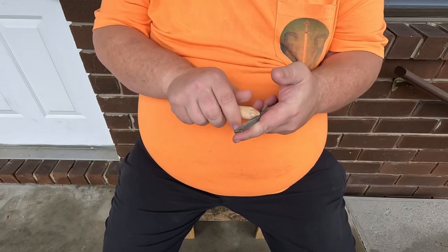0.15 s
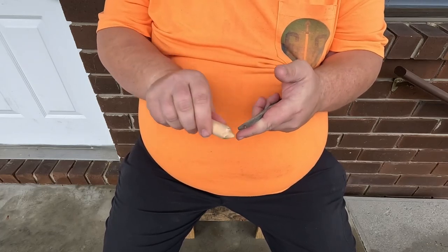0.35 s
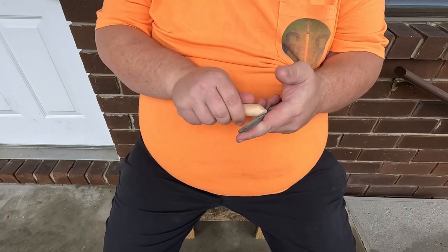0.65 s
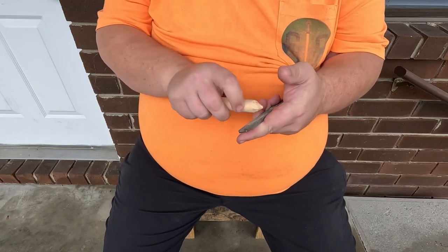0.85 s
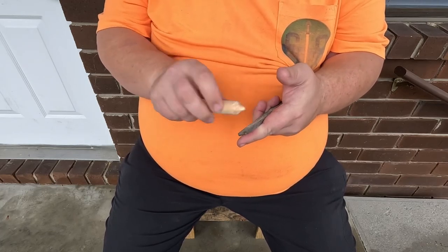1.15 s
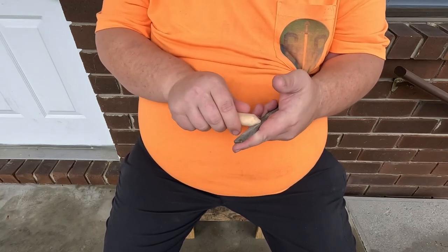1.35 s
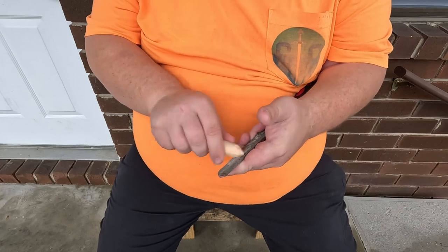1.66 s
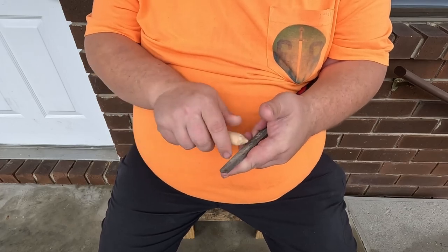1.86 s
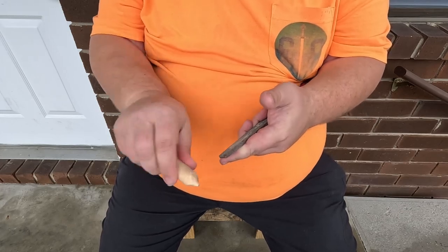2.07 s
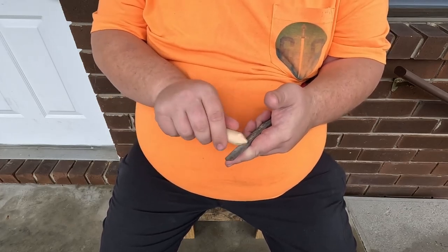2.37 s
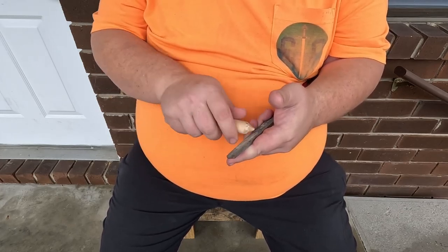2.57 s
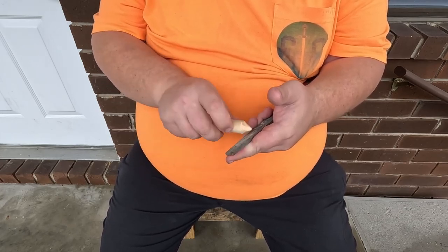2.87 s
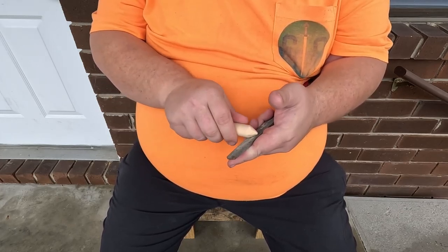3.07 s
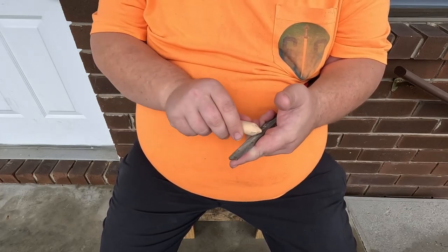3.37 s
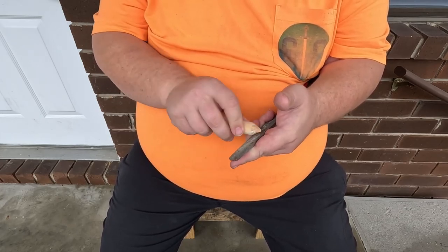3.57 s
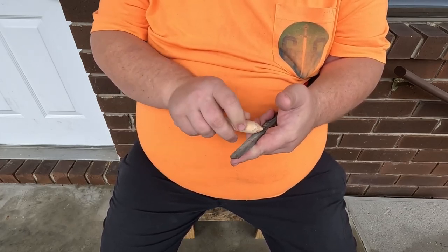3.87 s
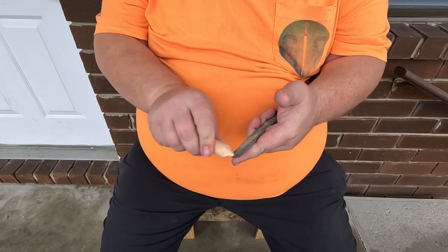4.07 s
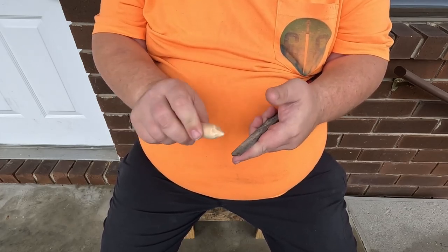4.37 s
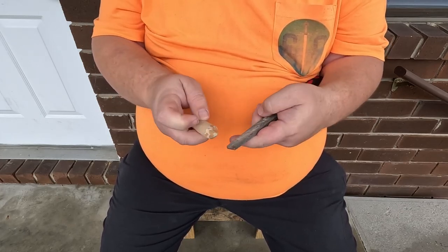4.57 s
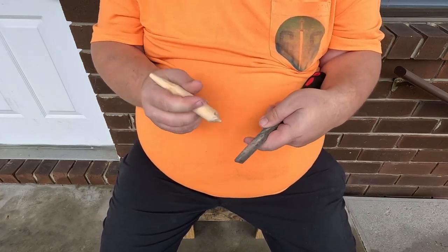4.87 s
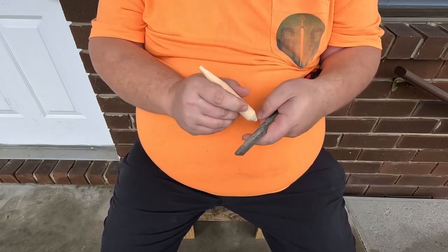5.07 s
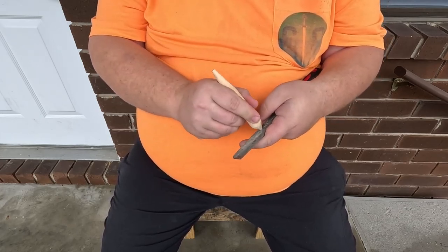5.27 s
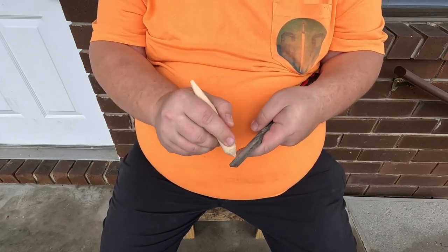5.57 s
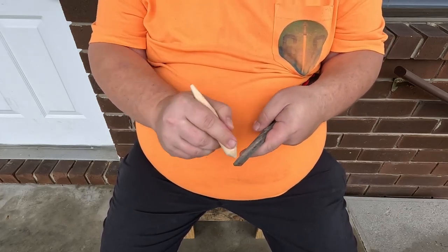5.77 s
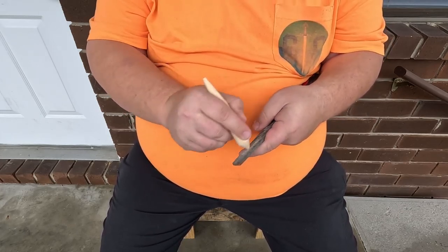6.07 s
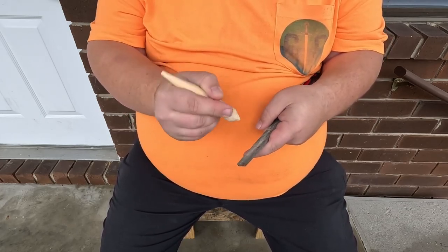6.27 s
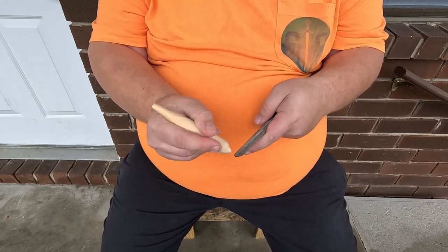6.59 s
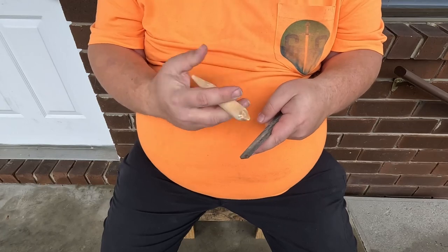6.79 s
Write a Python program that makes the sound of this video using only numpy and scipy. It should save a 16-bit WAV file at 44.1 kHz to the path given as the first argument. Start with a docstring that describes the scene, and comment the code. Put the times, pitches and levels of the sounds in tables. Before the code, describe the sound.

Close, dry rasps of wood on a steel file come at a steady brisk pace, each under a tenth of a second, with faint brushing and small knocks between. After a second-long break of finger rubs and soft clicks, scraping returns less evenly: two coarse strokes, a rapid run of light bright scratches, and one last rasp. Distant traffic and faint engine drones swell softly outdoors; the stereo pickup is near the hands.

```python
"""Outdoors by a brick wall, a wooden dowel is dragged in short quick strokes over the teeth of a hand-held file.
Each stroke tears wood fibres: random clicks and grit, filtered and swelled by pressure, excite dowel and steel.
Where the tip bites, it chatters over the teeth at a nearly even rate: harmonics pass through the dowel.
Between strokes wood and fingers brush the file (filtered grit) and tap it (decaying resonant noise).
Distant traffic rumbles, drones and roars behind as bands of noise, with a few narrow engine notes."""
import sys
import numpy as np
from scipy import signal
from scipy.fft import rfft, irfft, next_fast_len
from scipy.io import wavfile
from scipy.ndimage import uniform_filter1d

SR = 44100
rng = np.random.default_rng(int(sys.argv[2]) if len(sys.argv) > 2 else 0)


def dump(signal):
    """Clip the signal to [-1, 1] and save it as 16-bit WAV at the path in sys.argv[1]."""
    limited = np.clip(np.atleast_2d(signal).T, -1, 1)
    pcm = np.round(limited * 32767).astype(np.int16)
    wavfile.write(sys.argv[1], SR, pcm)


N = 305613

# Traffic levels: t/s, rumble level/dB, drone level/dB, tyre roar level/dB
TRAFFIC_LEVELS = [(0.0, -35.5, -47, -43), (0.71, -42.5, -47, -43.5), (2.08, -46, -51, -46.5),
                  (3.05, -45.5, -52, -49), (3.47, -42, -48.5, -49.5), (3.82, -48, -52.5, -52),
                  (4.82, -42.5, -46.5, -50), (5.23, -53, -47.5, -49.5), (5.77, -39.5, -47, -50),
                  (6.04, -44.5, -43, -48), (6.6, -44, -49, -47.5), (6.93, -40.5, -47, -47.5)]
# Spectra of the traffic bands: f/Hz, relative level/(dB per Hz)
RUMBLE_SPECTRUM = [(12, -31), (25, 3), (60, 6.5), (100, 1.5), (130, -28), (200, -71), (400, -120)]
DRONE_SPECTRUM = [(70, -30), (110, 0), (150, 0.5), (200, -6.5), (260, -17), (400, -41), (800, -120)]
ROAR_SPECTRUM = [(380, -11.5), (650, -13), (843, -3), (1060, 1), (1600, -1.5), (2070, -6.5), (4800, -28.5),
                 (5870, -32), (7020, -35.5), (11000, -51), (14300, -96), (22000, -120)]
HOLLOW_SPECTRUM = [(180, -41), (240, 2.5), (330, -4), (550, 7), (700, 2), (900, -57), (1500, -120)]
HOLLOW_DB = -58.5  # steady wash
# Likeness of left and right in the traffic: f/Hz, correlation [1 = identical]
LEFT_RIGHT_LIKENESS = [(60, 1.0), (150, 1), (380, 0.95), (950, 0.81), (2400, 0.64), (15000, 0.39)]
# Far engines, one table a pass: t/s, pitch f/Hz, level/dB
ENGINE_PASSES = [
    [(0.1, 59, -48), (0.36, 81.3, -41.5), (1.13, 88.2, -47.5), (1.35, 56.6, -33)],
    [(4.3, 75, -52), (4.55, 65.3, -52), (5.1, 69.6, -38), (5.5, 61.6, -39.5), (5.95, 72, -48),
     (6.3, 61, -56)],
    [(3.3, 149, -58.5), (4.2, 153.8, -53), (4.87, 158.7, -48.5), (5.4, 143, -58), (5.65, 168.2, -50),
     (6.4, 165, -48)],
]

# Modes of the file, damped by the hand: f/Hz, width/Hz, level/dB
STEEL_MODES = [(2060, 280, -10), (3900, 170, -3), (5300, 400, -9), (5770, 170, 4), (6400, 400, -13),
               (7870, 220, -16), (10200, 500, -14), (13900, 500, -26)]
# Spectra of the contact sounds: f/Hz, relative level/(dB per Hz)
TEARING_SPECTRUM = [(300, -74), (650, -7.5), (1050, 8), (1440, -3.5), (2000, 0.5), (3500, 2.5), (4450, -5),
                    (5660, 0.5), (8280, -16), (9930, -13.5), (11900, -64), (14000, -23), (15500, -18)]
DOWEL_SPECTRUM = [(820, -13), (1400, -3), (1680, -3.5), (3900, 5.5), (4710, -15), (5740, -8), (7000, -28),
                  (10200, -58), (12000, -30), (15600, -37), (22000, -120)]
RUSTLE_SPECTRUM = [(1500, -36), (3000, 2), (5000, -2), (8000, -10.5), (10500, -12), (12000, -22),
                   (14000, -25), (15500, -45)]

# Light rubs of wood and fingers: start t/s, length/s, place of the peak [0-1], peak level/dB,
# steel ring level/dB against the rustle
LIGHT_RUBS = [(.30, 0.11, 0.3, -69, -2), (0.472, .08, 0.7, -74, 4), (1.23, .06, .4, -76, 4),
              (1.378, 0.14, 0.3, -66, 2), (1.563, 0.046, .2, -67.5, -6), (1.84, 0.051, .3, -67, -7),
              (2.167, 0.067, .55, -72.5, 5), (2.567, .035, .6, -73, 5), (2.89, 0.061, 0.2, -67, -2),
              (3.34, 0.19, 0.2, -73, -8), (3.658, .045, .8, -68, -6), (3.87, 0.051, .5, -75, -2),
              (4.014, 0.098, 0.96, -69, -9), (4.486, 0.057, 0.05, -58.5, -8),
              (4.526, 0.089, 0.35, -69, -12), (4.578, 0.11, 0.36, -66, -12), (4.645, 0.079, .6, -66, -15),
              (4.695, 0.08, 0.33, -64.5, 4), (4.841, 0.0076, .4, -58, -10), (4.873, 0.085, 0.36, -69.5, 9),
              (4.94, 0.04, .4, -62.5, -11), (5.048, .035, .3, -68, -8), (5.143, .07, 0.25, -68, -15),
              (5.277, 0.045, 0.4, -82, -10), (5.756, 0.061, 0.34, -55, -4), (5.886, .05, 0.9, -70, -6),
              (6.506, 0.12, 0.93, -60, -7), (6.66, 0.13, 0.6, -68, -12), (6.73, 0.18, 0.46, -63.5, -14),
              (6.841, 0.046, 0.35, -65, 8)]
RUB_EDGE_DB, RUB_LUMPS_DB, FIDGET_DB = -23.5, 2, -77  # fall to a rub's edges, unevenness, constant faint touch
# Dust and slip rustle on late in a stroke: level against its peak, decay, ring against rustle, start [share]
TRAIL_DB, TRAIL_T60_S, TRAIL_RING_DB, TRAIL_FROM = -34, 0.24, -10, 0.74

# Taps of wood on steel or skin: t/s, level/dB at the onset before the knock and crack shares, pitch f/Hz
WOOD_TAPS = [(0.3055, -39, 1480), (0.667, -37, 2600), (3.0674, -41, 1960), (3.461, -29.5, 2000),
             (3.6793, -39, 1840), (4.0302, -40, 1750), (4.3092, -35.5, 1890), (5.2765, -37.5, 1300),
             (5.674, -31, 1210), (5.9316, -27, 2040), (6.5838, -46, 1610)]
TAP_T60_S = 0.035

# Chatter over the teeth: start t/s, length/s, place of the peak [0-1], tooth rate f/Hz at start and at end,
# peak level/dB before lumps and steel, level/dB of the tooth-rate tone against the upper harmonics
TOOTH_CHATTER = [(0.028, 0.0096, 0.35, 1010, 1020, -30.5, 5), (0.04, 0.025, 0.34, 992, 1065, -31.5, 7),
                 (0.774, 0.014, 0.43, 964, 925, -23.5, -2), (0.79, 0.013, 0.44, 905, 1020, -27.5, 5),
                 (1.123, 0.026, 0.65, 902, 933, -25, -3), (1.474, 0.016, 0.92, 1189, 1404, -19.5, -6.5),
                 (1.743, 0.011, 0.64, 910, 960, -32, -12), (1.754, 0.012, 1, 926, 972, -20, -10),
                 (1.765, 0.0098, 0.43, 1123, 1096, -22.5, -1),
                 (1.773, 0.013, 0.55, 1198, 1220, -22.5, -2.5), (2.436, 0.0117, 0.97, 950, 1170, -32, 2),
                 (2.459, 0.022, 0.74, 1013, 985, -28.5, 0.5), (2.789, 0.027, 0.64, 834, 932, -26.5, -8.5),
                 (3.307, 0.013, 0.8, 758, 804, -30, -26), (3.511, 0.026, 0.32, 731, 809, -24.5, -14),
                 (3.533, 0.019, 0.95, 846, 677, -32, -15), (3.746, 0.026, 0.8, 800.5, 746, -18, -17.5),
                 (4.365, 0.016, 0.31, 758, 835, -35.5, 11), (5.434, 0.036, 0.62, 566.4, 727, -21.5, -12.5),
                 (5.47, 0.0055, 1, 960, 940, -32.5, 8), (5.687, 0.025, 0.16, 648, 722, -33.5, 11),
                 (5.725, 0.0237, 0.5, 940, 1110, -39.5, 13), (5.933, 0.018, 0.086, 1100, 1170, -28, 22),
                 (6.085, 0.03, 0.41, 1183, 1010, -36, 21), (6.203, 0.026, 0.42, 980, 987, -38, 9),
                 (6.611, 0.029, 0.96, 581, 794, -24.5, -9.5)]
WOOD_HZ, WOOD_PER_TOOTH = 700, 1.766  # the dowel sounds higher when the teeth pass faster

# Strokes: start t/s, length/s, landing level/dB, place of the peak [0-1], peak level/dB,
# treble level/dB and steel ring level/dB against the tearing, dowel resonance f/Hz early and late,
# its level/dB against the tearing
FILE_STROKES = [(.006, 0.062, -32, 0.9, -28, -24, -12, 2020, 2100, -19),
                (.355, 0.078, -40, 0.44, -32, -14.5, -7, 3120, 2250, -9),
                (0.745, 0.072, -41.5, 0.58, -31, -20, -7, 3280, 1880, -9),
                (1.084, 0.076, -39.5, 0.43, -30.5, -22.5, -13, 1900, 1880, -12),
                (1.437, 0.057, -38, 0.82, -29, -16, -9, 2640, 2600, -8.5),
                (1.734, 0.061, -35, 0.66, -29, -24, -8, 2840, 2250, -12),
                (2.076, 0.065, -39, 0.82, -33.5, -13, -7, 2840, 3480, -6),
                (2.434, 0.069, -34.5, 0.49, -26.5, -23, -10, 2800, 2740, -11),
                (2.754, 0.073, -41.5, 0.5, -33.5, -21, -13.5, 2840, 1930, -5),
                (3.251, 0.077, -39, 1, -34.5, -33, -14, 2570, 2780, -13),
                (3.488, 0.062, -52, 0.48, -32, -26, -10, 2290, 2520, 2),
                (3.697, 0.09, -52, 0.69, -31, -25, -11, 2800, 2140, 0),
                (4.082, 0.091, -47.5, 0.57, -36.5, -19.5, -7, 2440, 2080, -4.5),
                (4.307, 0.087, -50.5, 0.88, -34, -18.5, -8, 1950, 2700, -22),
                (5.422, 0.072, -40, 0.39, -34, -18, -4, 1690, 1970, 0),
                (5.684, 0.077, -37, 0.49, -36, -6.5, -4, 1870, 1600, -12),
                (5.804, 0.042, -44.5, 0.76, -42, -13, -6.5, 1870, 1770, -16),
                (5.928, 0.036, -20, 0.18, -34, -5, -6, 2010, 3940, -13),
                (5.983, 0.073, -48, 0.33, -36.5, -7.5, 0, 3400, 3750, -1.5),
                (6.064, 0.057, -48, 0.46, -35.5, -0.5, 0, 3920, 3640, -3),
                (6.128, 0.055, -40, .6, -34.5, -7, -3, 1860, 3900, -10),
                (6.196, 0.057, -36.5, 0.73, -34, -4, 1.5, 1950, 4020, -16),
                (6.604, 0.052, -38, 0.54, -28.5, -38, -9.5, 1720, 1690, 1)]
LANDING_S, LIFT_DB, LIFT_CURVE = 0.0066, -19.5, 1.86  # ramp at either end; lift-off falls ever faster
TREBLE_FOLLOWS = .65  # share of the pressure swing, in dB, that the treble follows
BITE_DB, BITE_S = 2.5, .0025  # uneven catching of the teeth: depth, averaging time

# Level difference of near sounds: f/Hz, left minus right level/dB
NEAR_LEAN = [(60, 7), (150, 2), (380, -2), (950, -1.5), (2380, -2.5), (5980, -1), (15000, 3)]
# Phase between the microphone ports: f/Hz, lead of the left [rad]
PORT_LEAD = [(100, 0), (400, -.09), (1000, -.22), (2000, -.44), (3200, -.7), (4200, -.75), (5000, -.5),
             (9000, -.12), (15000, 0)]
# Final tone of the whole mix: f/Hz, relative level/dB
FINAL_TONE = [(9000, 2), (10800, 1), (12000, -5.5), (14000, 1), (15000, -28), (15600, -40)]
EDGE_HZ = 15650  # band limit


def gain_of(db):
    """Logarithmic level: decibels become an amplitude factor."""
    return 10 ** (np.asarray(db) / 20)


def evened(x):
    """Normalisation: the root mean square becomes 1."""
    return x / np.sqrt(np.mean(x ** 2) + 1e-20)


def read(points, hz):
    """Interpolation on a logarithmic frequency axis, as pitch is heard."""
    f, value = np.transpose(points)
    return np.interp(np.log(hz + 1), np.log(f + 1), value)


def add(mix, s, sound):
    """Superposition: a sound is added in place from time s."""
    part = mix[..., round(s * SR):][..., :sound.shape[-1]]
    part += sound[..., :part.shape[-1]]


def coloured(x, points):
    """Minimum phase: a causal filter follows from its spectrum, here with power gain 1."""
    hz = abs(np.fft.fftfreq(2048, 1 / SR))
    log_gain = np.log(gain_of(read(points, hz)))
    response = np.exp(np.conj(signal.hilbert(log_gain)))
    impulse = np.fft.ifft(response).real[:1024]
    return signal.oaconvolve(x, impulse / np.linalg.norm(impulse))[:len(x)]


def resonate(x, hz, width):
    """Heterodyne resonance: hz is shifted to zero, smoothed, and shifted back."""
    turn = np.exp(2j * np.pi * np.cumsum(hz * np.ones(len(x))) / SR)
    r = np.exp(-np.pi * width / SR)
    return 2 * (turn * signal.lfilter([1 - r], [1, -r], x / turn)).real


def steeply(x, hz, width):
    """Cascaded resonance: three passes leave little far from the peak."""
    once = resonate(x, hz, width)
    twice = resonate(once, hz, 2 * width)
    return evened(resonate(twice, hz, 2 * width))


def steel(x):
    """Modal superposition: the force excites every mode of the file at once."""
    ringing = 0
    for hz, width, db in STEEL_MODES:
        ringing = ringing + gain_of(db) * resonate(resonate(x, hz, 3 * width), hz, width)
    return ringing


def crackle(size, per_s, spread_db):
    """Shot noise: random clicks, a few of them large, stand over fine grit."""
    draw = rng.random(size)
    tall = rng.exponential(1, size)
    grit = rng.standard_normal(size)
    clicks = (draw < per_s / SR) * gain_of(spread_db * np.minimum(tall, 4)) * np.sign(grit)
    return evened(evened(clicks) + 0.59 * grit)


def knotted(x, depth_db):
    """Moving contact: as it wanders over the wood, the colour shifts in knots a few ms long."""
    z = signal.stft(x, nperseg=256, noverlap=192)[2]
    knots = rng.standard_normal(z.T.shape).T
    knots = uniform_filter1d(uniform_filter1d(knots, 4, 0), 6, 1)
    return evened(signal.istft(z * gain_of(depth_db * evened(knots)), nperseg=256, noverlap=192)[1][:len(x)])


def wash(points, size, patchy_db):
    """Partial coherence: left and right noise share a part set by frequency, with drifting patches."""
    frames, hz = 4 * N // size + 5, np.fft.rfftfreq(size, 1 / SR)
    a, b, c, d, patches = rng.standard_normal((frames, len(hz), 5)).T
    patches = evened(uniform_filter1d(uniform_filter1d(patches, 10, 0), 10, 1))
    same = np.clip(read(LEFT_RIGHT_LIKENESS, hz), -1, 1)[:, None]
    left, other = a + 1j * b, c + 1j * d
    z = np.array([left, same * left + np.sqrt(1 - same ** 2) * other])
    z *= gain_of(read(points, hz)[:, None] + patchy_db * patches)
    return evened(signal.istft(z, nperseg=size, noverlap=size * 3 // 4)[1][:, :N])


def engine(rows, width):
    """Narrow-band noise: a far engine note, blurred by distance, follows a gliding pitch."""
    s, hz, db = np.transpose(rows)
    t = np.arange(s[0], s[-1], 1 / SR)
    pitch = np.interp(t, s, hz)
    note = resonate(rng.standard_normal(len(t)), pitch, width)
    note = evened(resonate(note, pitch, 3 * width)) * signal.windows.tukey(len(t), .2)
    return s[0], gain_of(np.interp(t, s, db)) * note


def traffic():
    """Incoherent addition: rumble, drone and tyre roar swell on their own over a hollow wash."""
    s, *levels = np.transpose(TRAFFIC_LEVELS)
    t = np.arange(N) / SR
    rumble, drone, roar = (gain_of(np.interp(t, s, db)) for db in levels)
    lows = rumble * wash(RUMBLE_SPECTRUM, size=4096, patchy_db=2.5)
    lows += drone * wash(DRONE_SPECTRUM, size=4096, patchy_db=0.5)
    mids = roar * wash(ROAR_SPECTRUM, size=1024, patchy_db=1.5)
    mids += gain_of(HOLLOW_DB) * wash(HOLLOW_SPECTRUM, size=2048, patchy_db=2.5)
    notes = np.zeros(N)
    for rows in ENGINE_PASSES:
        add(notes, *engine(rows, width=7.3))
    return lows + mids * gain_of([[-.5], [.5]]) + notes  # the mids are 1 dB stronger on the right


def wall(x):
    """Diffuse reflection: ground, body and brick wall return a short decaying scatter."""
    t = np.arange(4000) / SR
    tail = rng.standard_normal((2, len(t))) * gain_of(-60 * t / 0.071) * (t > .002)  # T60 71 ms, after 2 ms
    return gain_of(-11) * signal.oaconvolve(x, tail / np.linalg.norm(tail[0]), axes=1)[:, :N]


def brushing():
    """Light friction: skin and wood rustle faintly on the teeth, at times ringing the steel."""
    grit = crackle(N, per_s=6000, spread_db=1.5)
    rustle, ring = evened(coloured(grit, RUSTLE_SPECTRUM)), evened(steel(grit))
    touch, ringing = np.full(N, gain_of(FIDGET_DB)), np.zeros(N)
    for s, length, peak, db, ring_db in LIGHT_RUBS:
        u = np.linspace(0, 1, round(length * SR))
        from_peak = np.interp(u, [0, np.clip(peak, .05, .95), 1], [1, 0, 1])
        rub = gain_of(db + RUB_EDGE_DB * from_peak ** 2) * signal.windows.tukey(len(u), .25)
        add(touch, s, rub)
        add(ringing, s, rub * gain_of(ring_db))
    t = np.arange(SR // 4) / SR
    for s, length, _, _, db, *_ in FILE_STROKES:
        trail = gain_of(db + TRAIL_DB - 60 * t / TRAIL_T60_S)
        add(touch, s + TRAIL_FROM * length, trail)
        add(ringing, s + TRAIL_FROM * length, trail * gain_of(TRAIL_RING_DB))
    lumps = evened(uniform_filter1d(uniform_filter1d(rng.standard_normal(N), 300), 300))
    return gain_of(RUB_LUMPS_DB * lumps) * (touch * rustle + ringing * ring)


def taps():
    """Damped impact: a short woody knock with a little crack decays exponentially."""
    out, t = np.zeros(N), np.arange(2000) / SR
    for s, db, hz in WOOD_TAPS:
        noise = rng.standard_normal(len(t))
        knock = 0.83 * steeply(noise, hz, 950)
        crack = 0.075 * coloured(noise, TEARING_SPECTRUM)
        add(out, s, gain_of(db - 60 * t / TAP_T60_S) * (knock + crack))
    return out


def chatter():
    """Periodic excitation: one pulse a tooth is a slightly uneven harmonic stack, passed through the dowel."""
    out = np.zeros(N)
    for s, length, peak, hz_a, hz_b, db, tone_db in TOOTH_CHATTER:
        u = np.linspace(0, 1, round(length * SR))
        wobble, lumps = (evened(uniform_filter1d(v, 60)) for v in rng.standard_normal((2, 2000)))
        hz = (hz_a + (hz_b - hz_a) * u) * (1 + 0.025 * wobble[:len(u)])
        turns = np.cumsum(hz) / SR
        # phases growing with k squared spread each pulse in time
        harmonics = sum(np.cos(2 * np.pi * k * turns + 0.223 * k * k) for k in range(2, 14))
        upper = coloured(harmonics, DOWEL_SPECTRUM)
        upper = evened(evened(upper) + 0.83 * steeply(upper, WOOD_HZ + WOOD_PER_TOOTH * hz, 1500))
        tone = gain_of(tone_db) * np.sqrt(2) * np.sin(2 * np.pi * turns)
        rise_and_fall = np.interp(u, [0, np.clip(peak, .1, .8), 1], [0, 1, 0])
        bite = np.sin(np.pi / 2 * rise_and_fall) ** 1.3
        add(out, s, gain_of(db + 2.0 * lumps[:len(u)]) * bite * evened(upper + tone))
    return out + gain_of(-5) * steel(out)


def strokes():
    """Friction under load: pressure sets how fibres tear; the dowel's free end and the steel ring along."""
    fibres = knotted(crackle(N, per_s=8000, spread_db=1.5), depth_db=4.0)
    bites = evened(uniform_filter1d(rng.standard_normal(N), round(BITE_S * SR)))  # teeth catch unevenly
    fibres = evened(fibres * gain_of(BITE_DB * bites))
    press, bright, ring, wood = np.zeros((4, N))
    for s, length, land_db, peak, db, treble_db, ring_db, hz_a, hz_b, wood_db in FILE_STROKES:
        u = np.linspace(0, 1, round(length * SR))
        peak = np.clip(peak, .1, .9)
        lift = np.clip((u - peak) / (1 - peak), 0, 1) ** LIFT_CURVE
        press_db = np.interp(u, [0, peak], [land_db, db]) + LIFT_DB * lift
        edges = np.clip(np.minimum(u, 1 - u) * length / LANDING_S, 0, 1)
        shape = gain_of(press_db) * edges
        add(press, s, shape)
        add(bright, s, edges * gain_of(db + treble_db + TREBLE_FOLLOWS * (press_db - db)))
        add(ring, s, shape * gain_of(ring_db))
        hz = hz_a + (hz_b - hz_a) * np.clip(2 * u - .5, 0, 1)  # the resonance slides as the contact moves
        local = fibres[round(s * SR):][:len(u)]
        add(wood, s, shape * gain_of(wood_db) * steeply(local, hz, 760))
    torn = coloured(fibres, TEARING_SPECTRUM)
    body = signal.sosfilt(signal.butter(4, 7500, "low", fs=SR, output="sos"), torn)
    treble = signal.sosfilt(signal.butter(4, 7500, "high", fs=SR, output="sos"), torn)
    tearing = press * evened(body) + bright * evened(treble)
    return tearing + wood + steel(fibres * ring) / np.std(steel(fibres))


def ports(x, turn):
    """Difference between two ports: turn(Hz) multiplies the left spectrum and divides the right."""
    size = next_fast_len(N + 512)
    half = turn(np.fft.rfftfreq(size, 1 / SR))
    return irfft(rfft(x, size) * np.array([half, 1 / half]), size)[:, :N]


def scene():
    """Direct and reflected sound: near hands with a left-right lean, their scatter, and far traffic."""
    hands = strokes() + chatter() + taps() + brushing()
    direct = ports(hands[None], lambda hz: gain_of(read(NEAR_LEAN, hz) / 2))
    return direct + wall(hands[None]) + traffic()


def record(dry):
    """Linear filtering: a final filter shapes and closes the top, two ports differ in phase, a band limit ends."""
    toned = np.array([coloured(channel, FINAL_TONE) for channel in dry])
    toned *= np.std(dry) / np.std(toned)  # overall level kept
    toned *= signal.windows.tukey(N, .002)  # brief fades at both ends
    apart = ports(toned, lambda hz: np.exp(.5j * read(PORT_LEAD, hz)))
    band_limit = signal.firwin(511, EDGE_HZ, window=("kaiser", 9), fs=SR)
    return signal.oaconvolve(apart, band_limit[None], "same")


dry = scene()
out = record(dry)
dump(out)
```